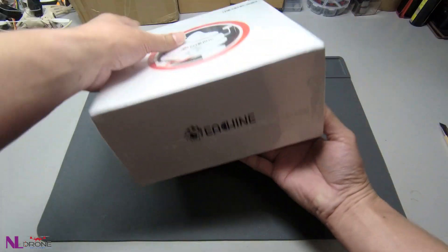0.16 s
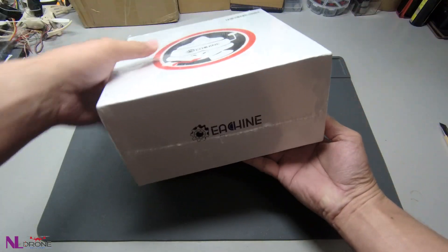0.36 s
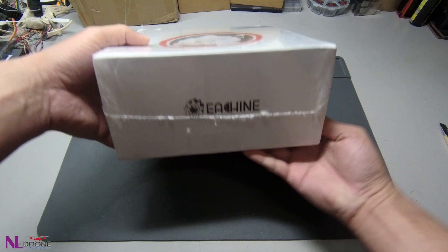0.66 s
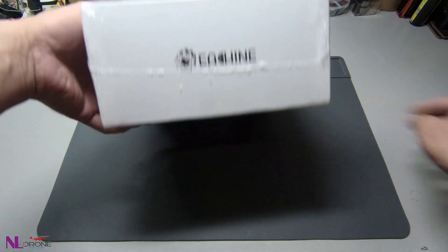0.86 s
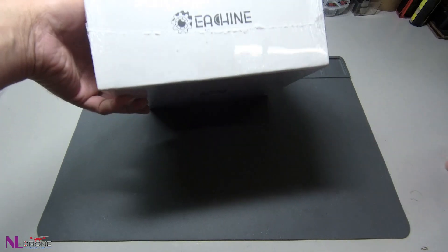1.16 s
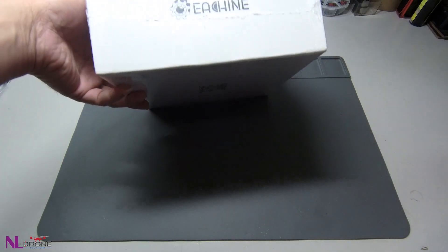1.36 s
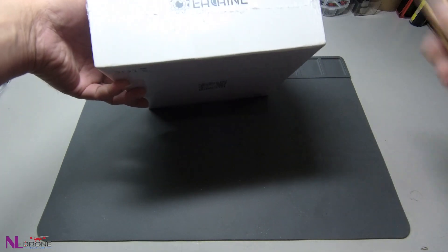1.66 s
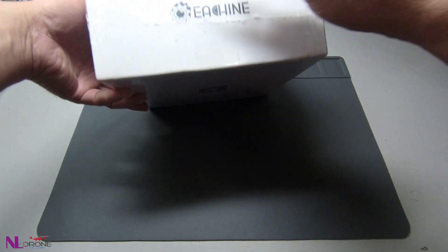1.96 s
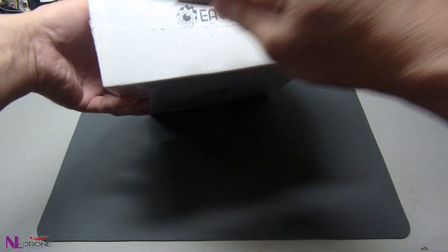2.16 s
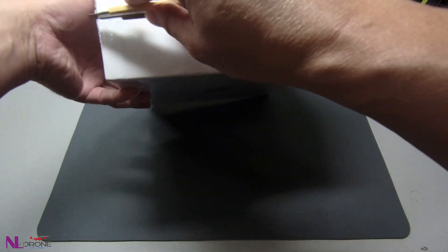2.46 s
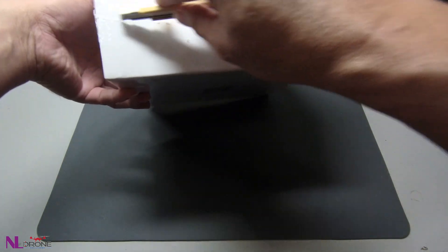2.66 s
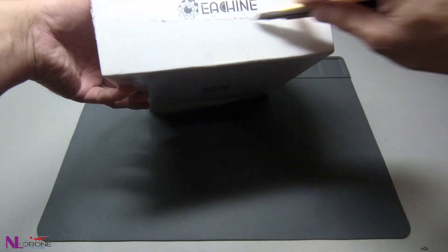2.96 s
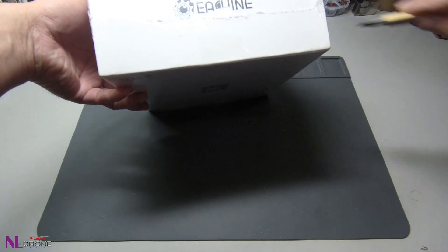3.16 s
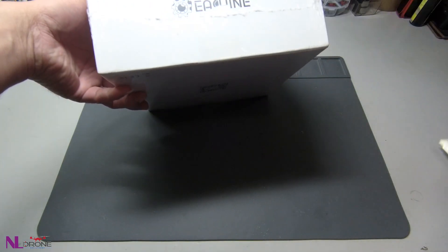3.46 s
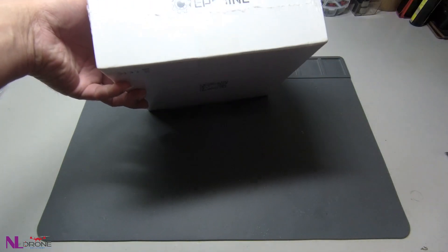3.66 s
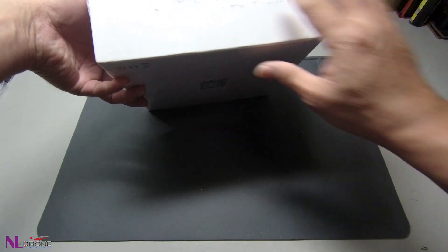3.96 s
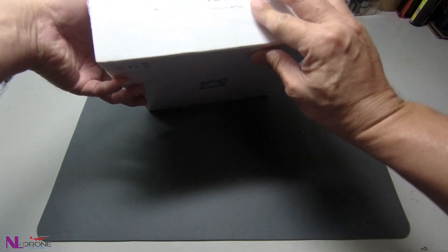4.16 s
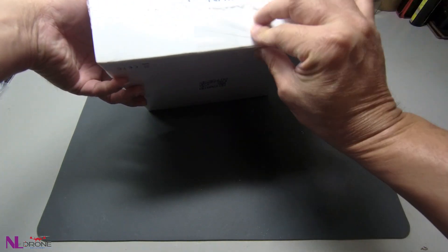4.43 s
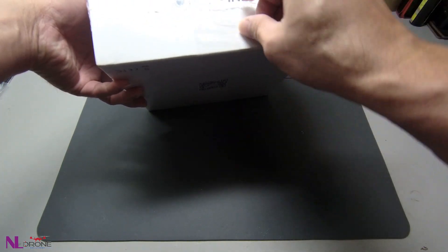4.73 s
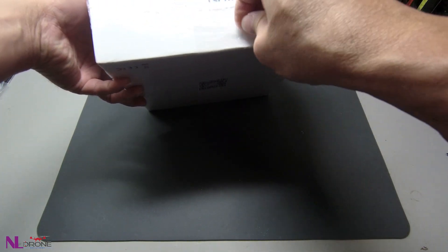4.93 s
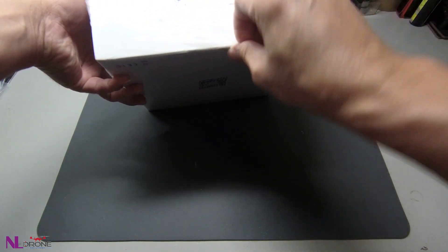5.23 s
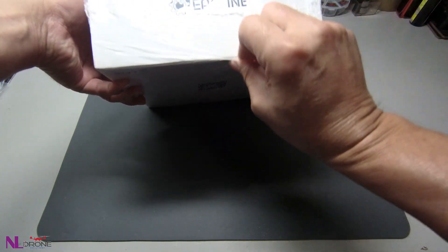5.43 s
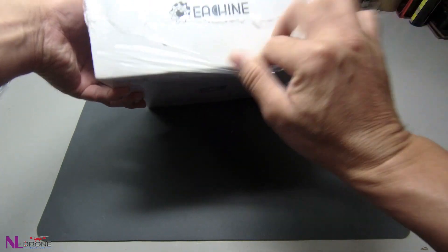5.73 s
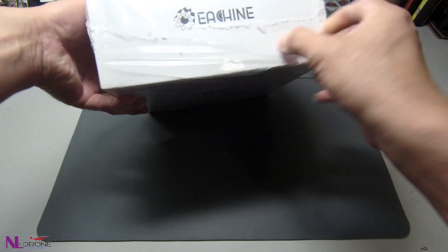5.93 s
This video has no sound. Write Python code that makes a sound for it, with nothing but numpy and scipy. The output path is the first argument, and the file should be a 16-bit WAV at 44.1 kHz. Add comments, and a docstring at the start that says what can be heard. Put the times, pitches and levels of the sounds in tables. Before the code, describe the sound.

A small room with steady low rumble and faint hiss, heard through a close stereo microphone. At 0.1-0.2 s two hollow cardboard thumps with short crisp film rustles, another low thump at 0.6. A knife clacks at 1.03 and scrapes briefly, then rattles in a cluster from 1.26 to 1.56. Quiet, with tiny film ticks at 2.2 and 2.5. From 2.65 to 3.18 the blade slits the wrap: a rapid dry stutter, then a rasping, groaning scrape with hiss and a high thin singing, closed by a bright snap at 3.16. The knife drops at 3.6-3.9, light knocks, then a hard clack and short slide. A box thump and light rustles begin at 4.06; sharp snap at 4.52. Strong cracks at 4.97 and 5.09, a dense burst around 5.2-5.37 with the loudest, clipping snap at 5.28. Sparse soft crinkles and a low bump fade towards 6.1.

```python
"""At a desk in a small room, hands turn a shrink-wrapped cardboard box, pick up a craft knife, slit the
film, drop the knife and tear the film off. The taut film snaps and rustles: coloured noise bursts and grains.
The hollow box thumps in decaying modes and groans in low noise; the cutting blade rasps, hisses and sings.
The knife clatters and slides on the desk in ringing noise. Dense reflections answer from the small room;
a close stereo microphone clips on the loudest snaps, over steady rumble and hiss."""
import sys
import numpy as np
from scipy import signal
from scipy.fft import rfft, irfft, next_fast_len
from scipy.io import wavfile

SR = 44100
rng = np.random.default_rng(int(sys.argv[2]) if len(sys.argv) > 2 else 0)


def pcm_store(signal):
    """Save signal as 16-bit PCM."""
    levels = np.round(np.clip(np.atleast_2d(signal), -1, 1) * 32767)
    wavfile.write(sys.argv[1], SR, levels.astype(np.int16).T)


N = 268557
TIME = np.arange(N) / SR

# fingers drag and crumple the film:
# (start [s], end [s], rustle level [dB], treble shelf [dB], box drone level [dB])
FILM_RUBS = [(0.055, 0.063, -32.5, 10, -49), (0.187, 0.204, -35, 5, -46), (4.15, 4.219, -42.5, 3.5, -38),
             (4.287, 4.331, -43, -1, -40), (4.39, 4.505, -45, 0, -41.5), (4.52, 4.534, -32.5, 1, -35.5),
             (4.577, 4.575, -33.5, -7, -38), (4.689, 4.896, -49, -0.5, -49), (5.217, 5.257, -39, -8, -48),
             (5.289, 5.327, -28, 10, -51), (5.398, 5.491, -49.5, -7, -72), (5.616, 5.717, -43, -0.5, -66),
             (5.729, 5.777, -33, 0, -37), (5.789, 5.865, -45.5, -2, -49), (5.894, 6.011, -41.5, -0.5, -46),
             (6.002, 6.079, -44, -1, -50)]
# spectrum of the film: (frequency [Hz], gain [dB])
FILM_COLOUR = [(150, -17), (330, -3.5), (520, -2), (800, -5), (1100, -6), (1450, -6), (1780, -6.5),
               (2300, -6), (3300, -4), (4400, 0.5), (6200, -1.5), (8500, -1), (11500, 0.5), (14500, -9)]
# low spectrum of the box under friction: (frequency [Hz], gain [dB])
DRONE_COLOUR = [(60, -55), (130, -39), (170, -13.5), (230, -2.5), (280, -3.5), (340, -6.5), (440, -14),
                (620, -38), (1200, -46.5)]

FILM_PAN_DB = 1  # left over right
RUB_BASS_DB = 5  # bass shelf of dragged film
PATCH_DB = 12.5  # how far the patch of film that lets go stands out


def film():
    """The stretched wrap snaps where it gives way, and crinkles wherever fingers drag it."""
    # film giving way under blade or fingers: (time [s], level over 5 ms [dB], T60 [s],
    # bass shelf [dB], treble shelf [dB], resonance of the patch that lets go [Hz])
    snap_table = [(2.2228, -38.5, .018, -15, 1, 3820), (2.5365, -33, .02, -13, 6, 3840),
                  (2.8113, -25.5, 0.012, 17, 2, 4200), (3.1549, -33, .023, -3, 2, 1060),
                  (3.1626, -17.5, 0.024, 2, 13, 5400), (4.0606, -32.5, .015, 1.5, -3.5, 930),
                  (4.1639, -33, 0.036, -5.5, 2.5, 860), (4.5157, -16, .007, -2, 1.5, 3550),
                  (4.574, -29, 0.0076, 5.5, 4.5, 1750), (4.839, -30.5, 0.035, -13, 16, 5250),
                  (4.907, -32, 0.0085, 4.5, 0.5, 4070), (4.9718, -9.5, 0.012, -2.5, -8.5, 1820),
                  (4.979, -14.5, 0.0056, -3, 3.5, 1240), (4.9865, -23.5, 0.015, -4, 10, 3010),
                  (5.0598, -24, 0.017, 2, -14, 4070), (5.0832, -26, 0.011, 14, -6, 865),
                  (5.0916, -11.5, 0.0094, 4, -5.5, 1605), (5.2002, -22.5, 0.0045, -32, -3.5, 1700),
                  (5.23, -29, 0.014, -4, 3, 1620), (5.2404, -25, 0.0098, -10, 11, 1300),
                  (5.25, -22.5, .022, 5.5, -5, 3400), (5.2829, -3.5, .011, -2.5, -3, 2660),
                  (5.2876, -19.5, 0.014, 3, -4, 4000), (5.298, -12.5, 0.007, -17, 7, 4700),
                  (5.3179, -14, 0.023, -6, 3.5, 2220), (5.3672, -19, 0.0065, -10.5, -2, 1280),
                  (5.5716, -38, 0.0087, -7, 11, 883), (5.6352, -36, 0.0089, 3, 19, 920),
                  (5.7208, -31, .025, -16, 11, 3470), (5.7565, -31.5, .03, 24, 3, 4260),
                  (5.9026, -34.5, 0.0093, 11, 3.5, 7000), (5.9459, -28, 0.0042, -16, 2, 7800),
                  (6.0029, -37, 0.012, 15, -5, 830), (6.0493, -36, 0.0069, 2, 4, 7500)]
    # narrow resonances of the film: (frequency [Hz], width [Hz], level [dB])
    film_rings = [(1560, 70, 3.5), (1790, 250, -8), (4200, 260, -70)]
    dip_hz, dip_db = 1480, -2  # broad dip in the rustle
    crinkle = noise() * grain(rate=700, spread_db=3.0, grain_s=0.002, smooth=0.9)
    rubs = [(start, end, db, RUB_BASS_DB, treble_db, dip_hz, dip_db)
            for start, end, db, treble_db, _ in FILM_RUBS]
    rustle = strokes(rubs, crinkle, FILM_COLOUR, fade_s=0.019)
    events = [(*row, patch_ring(row[1])) for row in snap_table] + ticks()
    snaps = blows(scatter_pan(events, FILM_PAN_DB), noise(likeness=0.19), FILM_COLOUR, rise_s=0.000067)
    return resonate(snaps + rustle, film_rings)


def patch_ring(db, fade_from_db=-28.5, fade_db_per_db=0.21):
    """A hard snap lets go of a wide area, so one patch stands out less."""
    return PATCH_DB - fade_db_per_db * max(db - fade_from_db, 0)


def ticks(patch_hz=5000, spread_octaves=0.51):
    """Small creases flip at random while fingers drag the film."""
    ticks_per_s, t60_s = 25, 0.0072
    above_rub_db, spread_db = 3, 4
    rows = []
    for start, end, rub_db, treble_db, _ in FILM_RUBS:
        length = max(end - start, 0)
        for s in rng.uniform(start, start + length, int(ticks_per_s * length)):
            size, patch = rng.standard_normal(2)
            db = rub_db + above_rub_db + spread_db * size
            ring_hz = patch_hz * 2 ** (spread_octaves * patch)
            rows.append((s, db, t60_s, RUB_BASS_DB, treble_db, ring_hz, PATCH_DB))
    return rows


def cut(fade_s=0.0055):
    """The blade sticks and slips along the seam: the box groans, the card rasps, the slit hisses."""
    # the blade runs along the seam: (time [s], force on the blade [dB])
    force_table = [(2.649, -15), (2.72, -13.5), (2.77, -1), (2.88, -3), (2.96, 3), (3.05, -7), (3.11, -7.5),
                   (3.179, -15.5)]
    # spectrum of the rasping card: (frequency [Hz], gain [dB])
    scrape_colour = [(120, -57), (350, -13), (540, 5), (680, -9), (820, 5), (1030, -0.5), (1250, 1.5),
                     (1600, -2.5), (2200, -27), (3300, -22), (8000, -56)]
    # spectrum of the hissing slit: (frequency [Hz], gain [dB])
    slit_colour = [(1800, 3), (2700, 1), (3300, -5), (4200, 0), (5500, 4), (7000, -1), (8300, 0),
                   (9300, -4), (11500, -1), (13000, -12), (16000, -22)]
    groan_db, scrape_db = -32, -44  # at 0 dB force
    slit_db = -47  # the hiss does not follow the force
    s, force = np.transpose(force_table)
    force_db = np.interp(TIME, s, force)
    contact = np.clip(np.minimum(TIME - s[0], s[-1] - TIME) / fade_s, 0, 1)
    slips = grain(rate=290, spread_db=6.0, grain_s=0.0075, smooth=0.42)
    groan = unit(colour(noise(), DRONE_COLOUR)) * undb(groan_db + force_db)
    rasp = unit(colour(noise() * slips, scrape_colour))
    strip = card_strip(s[0], s[-1]) * slips
    scrape = (rasp + strip) * undb(scrape_db + force_db)
    hiss = unit(colour(noise() * slips, slit_colour)) * undb(slit_db)
    return contact * (groan + scrape + hiss + sing()) + stutter()


def card_strip(start, end):
    """The rasp rings the strip of card ahead of the blade, whose pitch falls along the cut."""
    start_hz, fall_hz_per_s, below_rasp_db = 4000, 4300, -8.5
    hz = start_hz - fall_hz_per_s * (np.clip(TIME, start, end) - start)
    return undb(below_rasp_db) * ringing(hz, wobble_hz=190)


def sing(wobble_hz=200, upper_db=-7):
    """Once it runs freely the thin blade sings: friction rings two resonances that glide up to pitch."""
    start_s, attack_s, hold_s, release_s = 2.84, 0.13, 0.053, 0.34
    final_hz, glide_hz, glide_s, level_db = 6140, 256, 0.032, -46
    age = np.maximum(TIME - start_s, 0)
    release = 1 - (age - attack_s - hold_s) / release_s
    swell = np.clip(np.minimum(age / attack_s, release), 0, 1)
    hz = final_hz - glide_hz * np.exp(-age / glide_s)
    low, high = (ringing(ratio * hz, wobble_hz) for ratio in (1, 1.39))
    return unit(low + undb(upper_db) * high) * swell * undb(level_db)


def stutter(treble_db=7, patch_hz=3800, patch_db=8, count=24):
    """At first the blade sticks and slips unevenly, slower and duller as it bites into the card."""
    start_s, end_s = 2.6626, 2.79
    first_gap_s, gap_growth, longest_gap_s, jitter = 0.0095, 1.19, 0.0168, 0.0434
    level_db, t60_s = -30.5, 0.01
    bass_db, bass_db_per_s = 10.5, 177  # the bass shelf rises with time
    gaps = np.minimum(first_gap_s * gap_growth ** np.arange(count), longest_gap_s)
    gaps = gaps * np.exp(jitter * rng.standard_normal(count))
    ages = np.cumsum(gaps) - gaps
    rows = [(start_s + age, level_db, t60_s, bass_db + bass_db_per_s * age, treble_db, patch_hz, patch_db)
            for age in ages if start_s + age < end_s]
    return blows(scatter_pan(rows, FILM_PAN_DB), noise(), FILM_COLOUR, rise_s=0.00007)


def ringing(hz, wobble_hz):
    """A resonance kept ringing by friction: slow noise modulates a tone whose pitch may move."""
    lowpass = signal.butter(2, wobble_hz, fs=SR, output="sos")
    wobble = signal.sosfilt(lowpass, rng.standard_normal((2, N)))
    return unit(wobble * np.cos(2 * np.pi * np.cumsum(hz) / SR))


def box(contact_s=0.0056, tap_db=-21, tap_t60_s=0.21, count=12000):
    """Jolts tap the card and ring panel and whole hollow box; dragging fingers make it drone."""
    # fingers or blade jolt the box:
    # (time [s], level over 12 ms [dB], panel pitch [Hz], gain of the whole-box modes [dB])
    bump_table = [(0.132, -17, 359, 2.5), (.197, -20.5, 269.4, -5), (.533, -43.5, 270, 1),
                  (.621, -19.5, 207.5, -1.5), (1.513, -37, 424, -1), (1.536, -35, 271, -1),
                  (2.809, -28, 258, -36), (2.856, -24.5, 293, -41), (2.874, -22.5, 303, -31),
                  (2.911, -22.5, 283, -30), (3.054, -28, 304, -22), (4.06, -21, 257.4, -11),
                  (4.153, -32, 301, -9), (4.317, -35.5, 290, -21), (4.514, -29.5, 261, -6.5),
                  (4.641, -37.5, 273, -31), (4.813, -30.5, 282, -24), (5.082, -25, 284, -17),
                  (5.168, -33, 282, -16), (5.283, -27, 417, -7), (5.754, -30.5, 320, -6)]
    # the struck panel: (multiple of its pitch, level [dB], multiple of the jolt's T60)
    panel_modes = [(1.004, 2.5, 1), (1.238, -1, .8), (1.5, -9.5, .7), (2.1, -16, .6), (3, -17.5, .6)]
    # the whole box flexing: (frequency [Hz], level [dB], multiple of the jolt's T60)
    shell_modes = [(173.4, -3.5, 1.5), (103, -12.5, 2), (54.7, -37, 6)]
    # spectrum of the tapped card: (frequency [Hz], gain [dB])
    tap_colour = [(100, -41), (450, -17), (750, -4), (1050, -1), (1400, -1), (1750, -10), (2300, -10),
                  (4000, -15), (12000, -30)]
    jolt_t60_s, pan_db = 0.033, -6  # leans right
    out, t = np.zeros((2, N)), TIME[:count]
    for s, db, pitch_hz, shell_db in bump_table:
        modes = [(ratio * pitch_hz, mode_db, life) for ratio, mode_db, life in panel_modes]
        modes += [(hz, mode_db + shell_db, life) for hz, mode_db, life in shell_modes]
        ring = np.zeros(count)
        for hz, mode_db, life in modes:
            decay = np.exp(-np.log(1000) * t / (life * jolt_t60_s))
            ring += undb(mode_db) * np.sin(2 * np.pi * hz * t) * decay
        # flesh pushes gradually, so the ring builds up over milliseconds
        ring *= 1 - np.exp(-(t / contact_s) ** 2)
        add(out, s, ring / np.std(ring[:int(.012 * SR)]) * undb(db) * place(pan_db))
    tap_rows = [(s, db + tap_db, tap_t60_s, 0) for s, db, *_ in bump_table]
    taps = blows(tap_rows, noise(), tap_colour, rise_s=0.00018)
    drag_rows = [(start, end, drone_db) for start, end, *_, drone_db in FILM_RUBS]
    drags = strokes(drag_rows, noise(), DRONE_COLOUR, fade_s=0.04)
    return out + taps + drags


def knife():
    """The knife and its loose blade rattle and slide on the desk, whose top thuds at every knock."""
    # the knife knocks on the desk and on other tools: (time [s], level over 5 ms [dB], T60 [s],
    # bass shelf [dB], treble shelf [dB], gain of the handle's broad resonance [dB])
    clack_table = [(1.0325, -21.5, 0.11, 10, 3, 2.5), (1.2602, -31.5, 0.028, 13, 2, -8),
                   (1.3588, -21, 0.034, 3, 5, 3), (1.3736, -26.5, .08, -10, -2, 3),
                   (1.4297, -26.5, 0.039, -5, -4, -9), (1.4651, -22.5, .06, -2, 1.5, 3.5),
                   (1.4753, -21.5, 0.022, -14.5, -7.5, 7), (1.5134, -30.5, 0.031, 15, 3.5, -14),
                   (1.556, -29.5, .025, -12, -5, -2), (1.686, -41, .038, -13, -11, -1),
                   (3.607, -39, 0.024, -7, -4, 3), (3.637, -35, 0.023, -12, -1, -2),
                   (3.6688, -20, 0.049, 7, -2.5, 1.5), (3.772, -27, 0.068, -2, -8, 3),
                   (3.7967, -14, 0.039, -2, -7, 15)]
    # the knife slides on the desk: (start [s], end [s], level [dB],
    # bass shelf [dB], treble shelf [dB], gain of the scraping resonance [dB])
    slide_table = [(1.05, 1.113, -44, -6, -12, 6), (1.112, 1.162, -37.5, 3, -3, 12),
                   (1.17, 1.26, -50.5, 11.5, -6, 5), (1.257, 1.349, -48, 2, -4, -9),
                   (1.394, 1.44, -45.5, 4, -16, -13), (1.482, 1.565, -37, -3.5, -8.5, -4),
                   (3.684, 3.744, -39.5, 0, -13, 5), (3.783, 3.783, -28.5, 4, -14, 1),
                   (3.808, 3.856, -27, 5, -4, 3.5), (3.845, 3.895, -36.5, 4, -6.5, -11)]
    # spectrum of the knife: (frequency [Hz], gain [dB])
    knife_colour = [(120, -25), (350, 2), (600, 1), (850, -4.5), (1100, -5.5), (1500, -5.5), (2000, -10),
                    (2500, -10.5), (3100, -7), (4000, -9), (5000, -5), (7000, -2.5), (9300, -1.5),
                    (11500, 4), (14500, -5)]
    # narrow resonances of the knife: (frequency [Hz], width [Hz], level [dB])
    knife_rings = [(557, 9.7, -21), (826, 29, -3), (1190, 47, -14), (1600, 45, -11), (3060, 62, -7),
                   (9300, 580, 0)]
    # spectrum of the desk top: (frequency [Hz], gain [dB])
    desk_colour = [(40, -14), (75, -14), (108, 3), (160, -8), (300, -5), (450, -6), (900, -40)]
    handle_hz, slide_hz, pan_db = 1580, 1340, -0.5
    desk_db, desk_t60_s = -22.5, 0.39  # level relative to the knock
    rattle = noise() * grain(rate=770, spread_db=-1, grain_s=0.00062, smooth=1.0)
    chatter = noise() * grain(rate=990, spread_db=6, grain_s=0.0037, smooth=0.34)
    knock_rows = [(*row, handle_hz, ring_db) for *row, ring_db in clack_table]
    knocks = blows(scatter_pan(knock_rows, pan_db), rattle, knife_colour, rise_s=0.00027)
    slide_rows = [(*row, slide_hz, ring_db) for *row, ring_db in slide_table]
    slides = strokes(slide_rows, chatter, knife_colour, fade_s=0.022)
    thud_rows = [(s, db + desk_db, desk_t60_s, 0) for s, db, *_ in clack_table]
    thuds = blows(thud_rows, noise(), desk_colour, rise_s=0.0013)
    return resonate(knocks + slides, knife_rings) + thuds


def room(x, early_db=4, early_s=0.0074, gap_s=0.0025, bass_hz=600):
    """Dense reflections from desk and walls, then a short tail that keeps its bass longest."""
    treble_t60_s, bass_t60_s = 0.24, 0.36
    t = TIME[:SR // 2]
    scatter = noise(split_hz=2220, low_pan_db=-1)[:, :len(t)]
    bass = signal.sosfilt(signal.butter(2, bass_hz, fs=SR, output="sos"), scatter)
    treble = signal.sosfilt(signal.butter(2, bass_hz, "high", fs=SR, output="sos"), scatter)
    # the minus sign keeps the two bands from cancelling where they meet
    tail = bass * np.exp(-np.log(1000) * t / bass_t60_s) - treble * np.exp(-np.log(1000) * t / treble_t60_s)
    tail = tail * (t > gap_s) * (1 + undb(early_db) * np.exp(-t / early_s))
    return signal.fftconvolve(x, unit(tail) / np.sqrt(len(t)), axes=1)[:, :N]


def air(level_db=-47.5):
    """Steady low rumble of the room with microphone hiss."""
    # spectrum of rumble and hiss: (frequency [Hz], gain [dB])
    air_colour = [(15, -19), (30, -6), (50, -1.5), (120, -3.5), (250, -1), (420, -5.5), (600, -8),
                  (850, -11), (1400, -15.5), (2500, -21), (5500, -20.5), (9000, -24), (16000, -25)]
    rumble = noise(split_hz=820, low_pan_db=-2.5, high_pan_db=-1.0)
    diffuse = undb(0.5) * rng.standard_normal((2, N)) * place(-2.5)
    return unit(colour(rumble + diffuse, air_colour, size=8192)) * undb(level_db)


def capsules(x):
    """The two capsules face the desk differently, so each favours its own part of the spectrum."""
    # left minus right: (frequency [Hz], level difference [dB])
    difference = [(700, 1), (1300, -2), (2400, 3.5), (5000, 2.5), (9000, 1), (15000, -6.5)]
    left, right = ([(hz, side * db / 2) for hz, db in difference] for side in (1, -1))
    return np.vstack([colour(x[[0]], left, size=512), colour(x[[1]], right, size=512)])


def blows(table, source, points, rise_s, count=5000):
    """Each blow is a burst of noise with a fast rise and exponential decay, cut off after count samples."""
    out, t = np.zeros((2, N)), TIME[:count]
    for s, db, t60, *tone, pan_db in table:
        decay = (1 - np.exp(-t / rise_s)) * np.exp(-np.log(1000) * t / t60)
        burst = source.take(int(s * SR) + np.arange(count), axis=1, mode="wrap") * decay
        burst = colour(burst, points, *tone, size=2048) * place(pan_db)
        # the level counts the whole burst's energy as if packed into 5 ms
        add(out, s, unit(burst) * undb(db) * np.sqrt(.005 * SR / count))
    return out


def strokes(table, source, points, fade_s):
    """Each stroke swells, holds and fades, with a colour of its own."""
    out = np.zeros((2, N))
    for start, end, db, *tone in table:
        i = int(max(start - fade_s, 0) * SR)
        j = min(int((max(end, start) + fade_s) * SR), N)
        t = TIME[i:j]
        swell = np.clip(np.minimum(t - start + fade_s, end + fade_s - t) / (2 * fade_s), 0, 1)
        add(out, i / SR, unit(colour(source[:, i:j], points, *tone)) * swell * undb(db))
    return out


def scatter_pan(rows, pan_db, spread_db=2.9):
    """Give each event a slightly different place around pan_db."""
    return [(*row, pan_db + spread_db * z) for row, z in zip(rows, rng.standard_normal(len(rows)))]


def noise(split_hz=1700, low_pan_db=-6.0, high_pan_db=0, likeness=0.17):
    """Stereo white noise: long waves reach both capsules alike, short ones mostly differ."""
    low, centre, *sides = rfft(rng.standard_normal((4, next_fast_len(N, True))))
    shared = 1 / (1 + (np.linspace(0, SR / 2, len(low)) / split_hz) ** 6)
    high = np.sqrt(likeness) * centre + np.sqrt(1 - likeness) * np.array(sides)
    both = np.sqrt(shared) * low * place(low_pan_db) + np.sqrt(1 - shared) * high * place(high_pan_db)
    return irfft(both)[:, :N]


def grain(rate, spread_db, grain_s, smooth):
    """Envelope of many tiny slips of unequal size over a smooth share; rate is in slips per second."""
    size_db = spread_db * np.minimum(rng.exponential(size=N), 4)
    slips = (rng.random(N) < rate / SR) * undb(size_db) ** 2
    power = signal.lfilter([1], [1, -np.exp(-1 / (grain_s * SR))], slips)
    return unit(np.sqrt(power / power.mean() + smooth))


def colour(x, points, bass_db=0, treble_db=0, ring_hz=1000, ring_db=0, size=4096):
    """Causal filter through (Hz, dB) points, with a shelf on either side and one broad resonance."""
    log_hz = np.log(np.maximum(np.fft.rfftfreq(size, 1 / SR), 1))
    hz, db = np.transpose(points)
    db = np.interp(log_hz, np.log(hz), db)
    db = db + np.interp(log_hz, np.log([1200, 4000, 10000]), [bass_db, 0, treble_db])
    db = db + ring_db * np.exp(-((log_hz - np.log(ring_hz)) / .25) ** 2)
    # folding the cepstrum forward gives minimum phase
    cepstrum = irfft(np.log(undb(db)))
    cepstrum[1:size // 2] *= 2
    cepstrum[size // 2 + 1:] = 0
    impulse = irfft(np.exp(rfft(cepstrum)))
    return signal.fftconvolve(x, impulse[None], axes=1)[:, :x.shape[1]]


def resonate(x, rings):
    """Add narrow resonances to a sound."""
    return x + sum(undb(db) * signal.lfilter(*signal.iirpeak(hz, hz / width, fs=SR), x)
                   for hz, width, db in rings)


def undb(db):
    """Decibels to gain."""
    return 10 ** (np.asarray(db) / 20)


def unit(x):
    """Scale to rms 1."""
    return x / np.sqrt(np.mean(x ** 2))


def place(pan_db):
    """Left and right gains of a level difference, left over right."""
    return unit(undb(np.array([[pan_db], [-pan_db]]) / 2))


def add(out, s, x):
    """Mix x into out from second s on."""
    i = max(int(s * SR), 0)
    out[:, i:i + x.shape[1]] += x[:, :max(N - i, 0)]


def scene():
    """Box and film are close to the microphone; the knife, further away, excites more of the room."""
    film_room_db, box_room_db, knife_room_db = -8.5, -9, -4.5
    wrap, body, tool = film(), box() + cut(), knife()
    sends = undb(film_room_db) * wrap + undb(box_room_db) * body + undb(knife_room_db) * tool
    return capsules(wrap + body + tool + room(sends)) + air()


def record(dry, top_hz=15900):
    """The loudest snaps clip at full scale; a steep low-pass cuts the top."""
    lowpass = signal.ellip(10, .2, 70, top_hz, fs=SR, output="sos")
    return signal.sosfilt(lowpass, np.clip(dry, -1, 1))


dry = scene()
out = record(dry)
pcm_store(out)
```